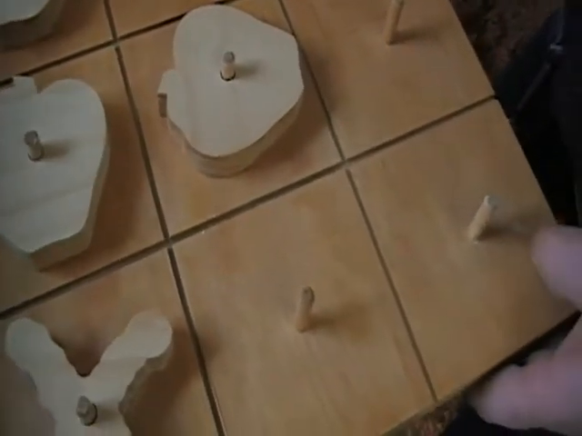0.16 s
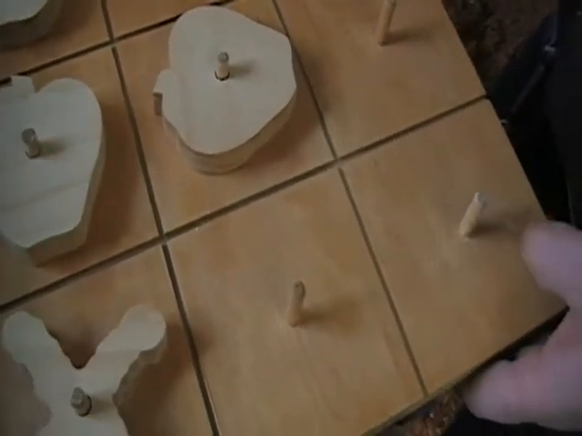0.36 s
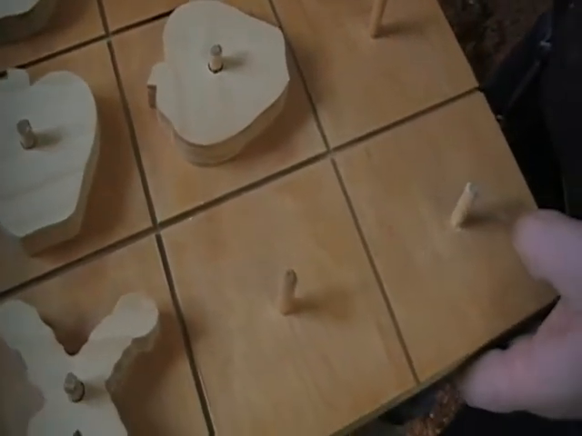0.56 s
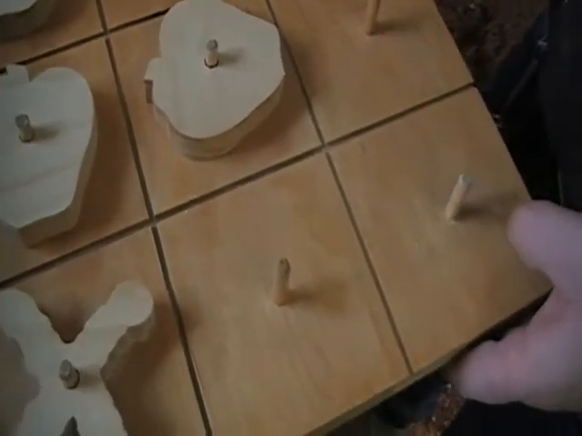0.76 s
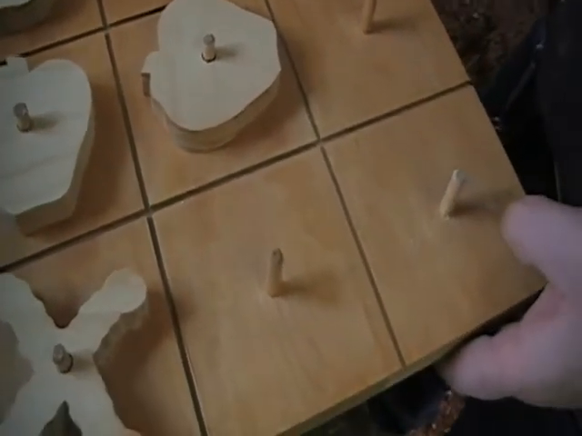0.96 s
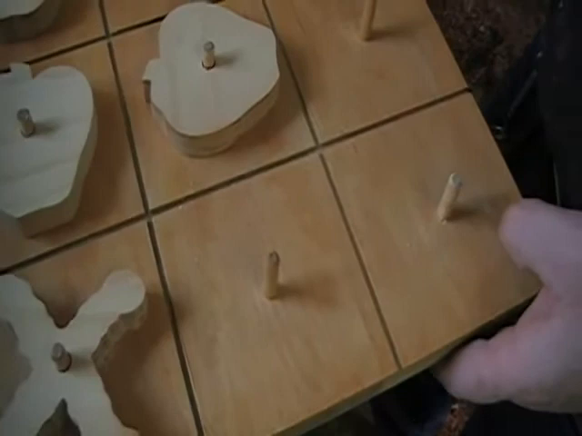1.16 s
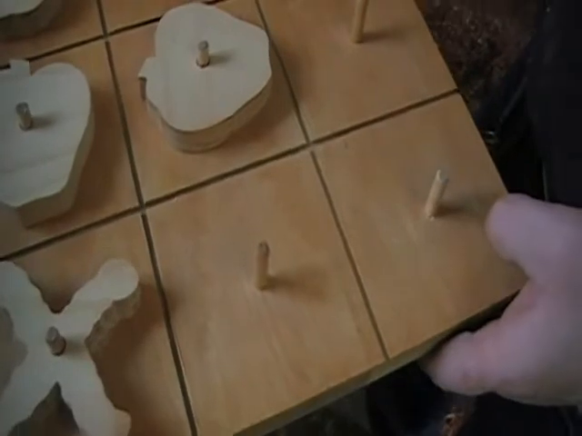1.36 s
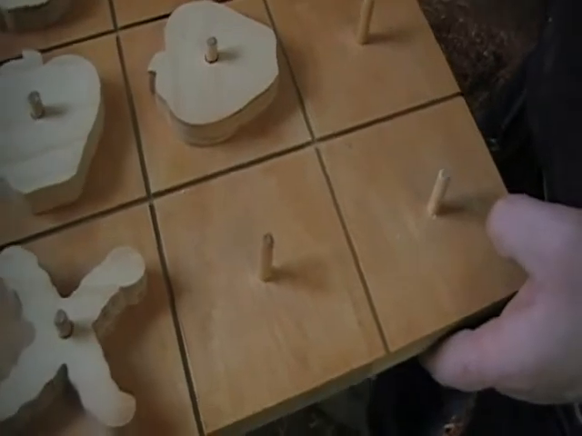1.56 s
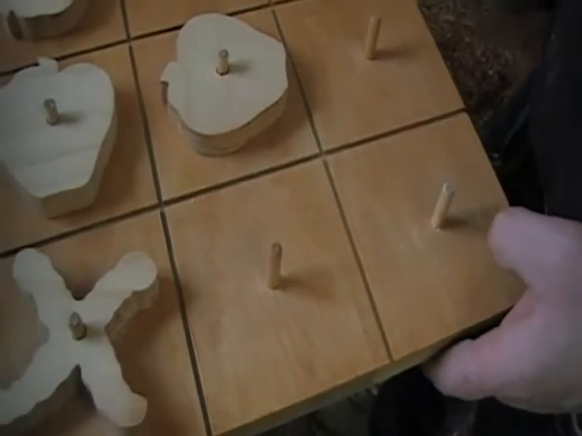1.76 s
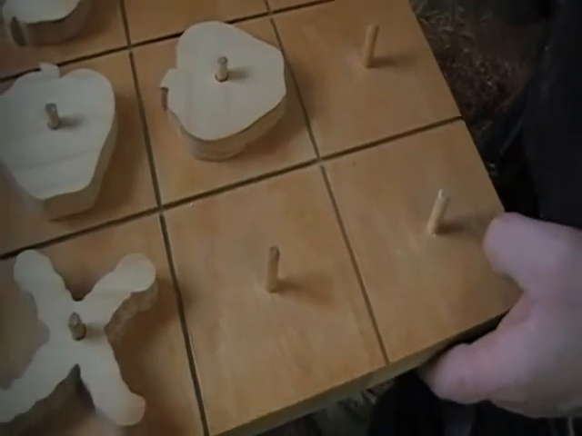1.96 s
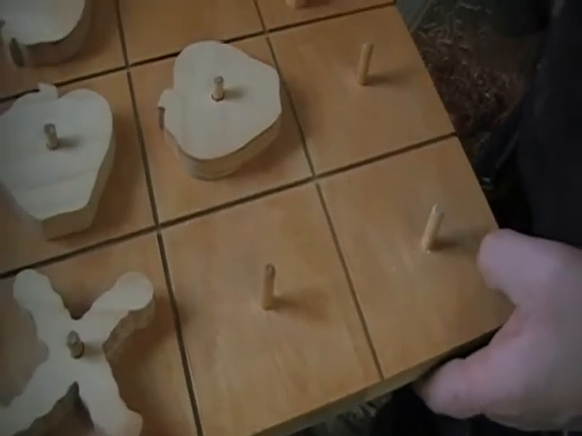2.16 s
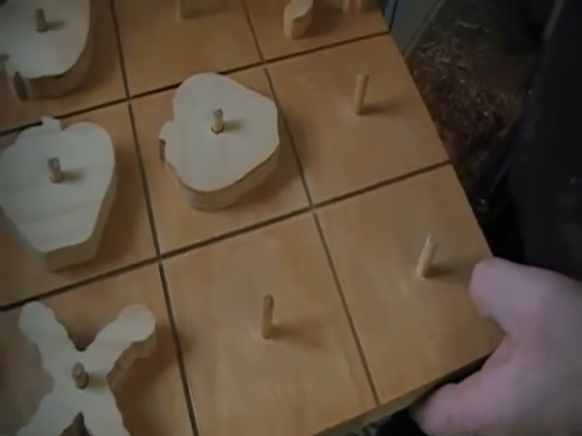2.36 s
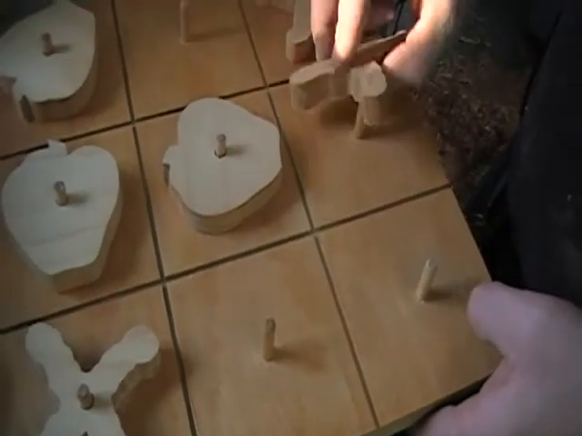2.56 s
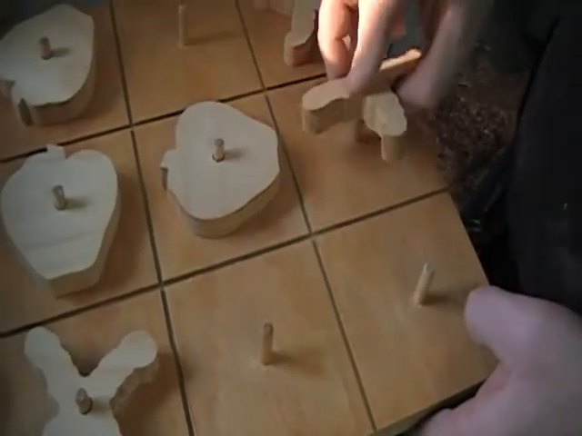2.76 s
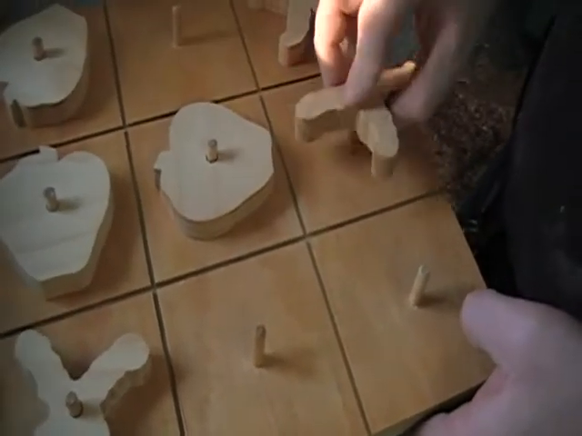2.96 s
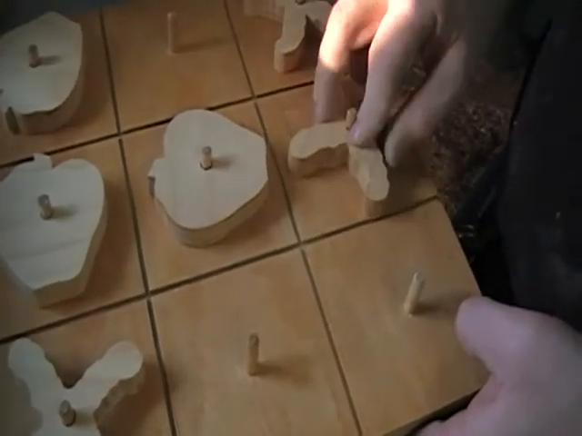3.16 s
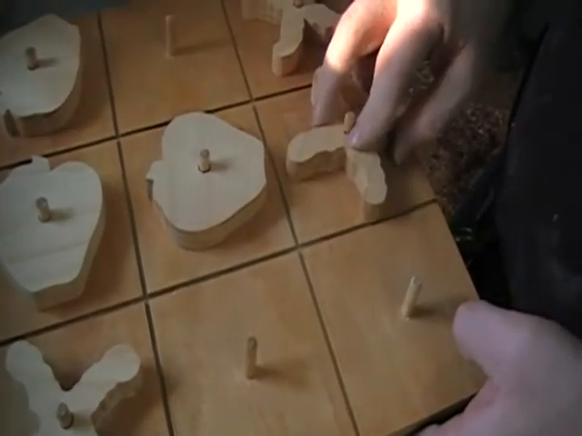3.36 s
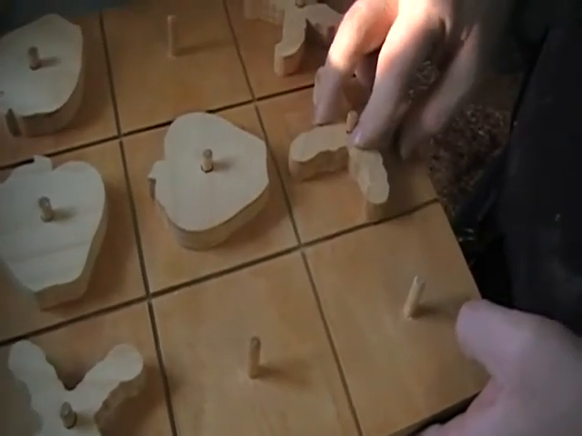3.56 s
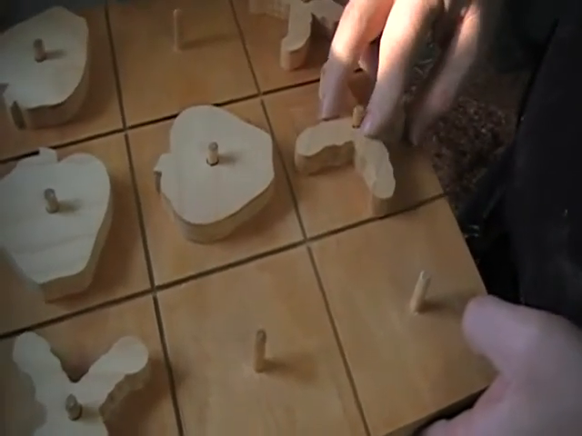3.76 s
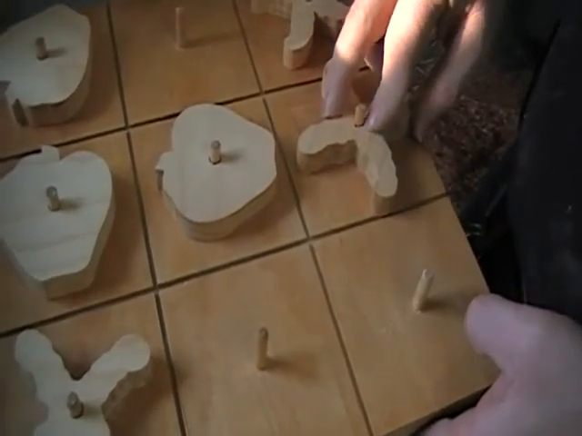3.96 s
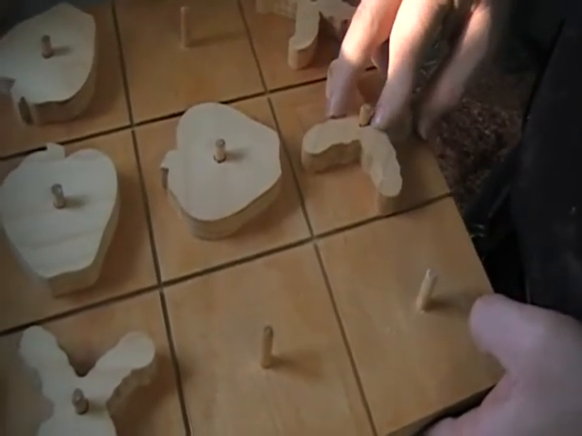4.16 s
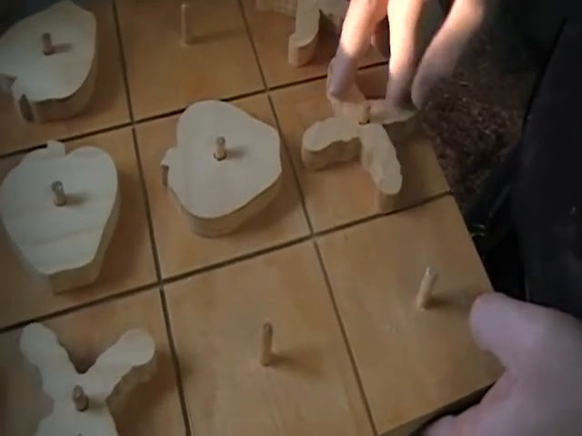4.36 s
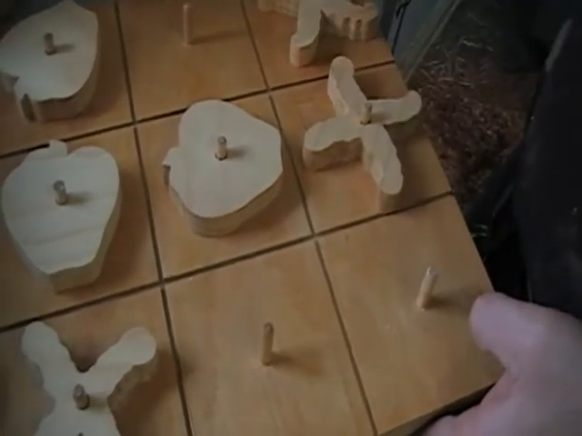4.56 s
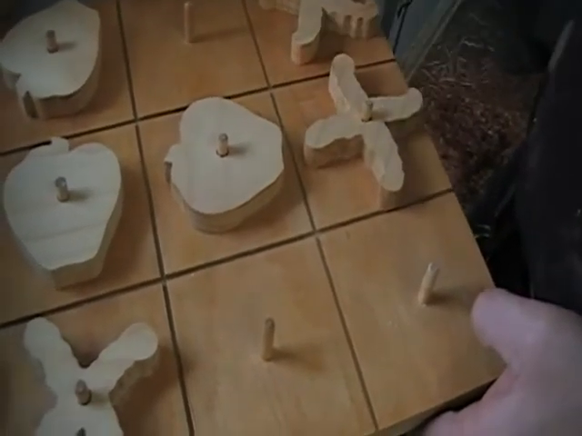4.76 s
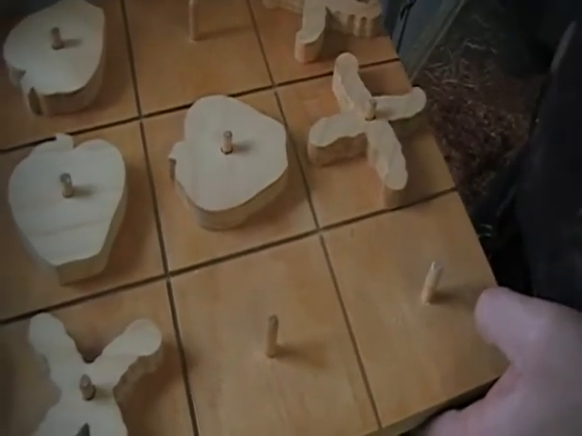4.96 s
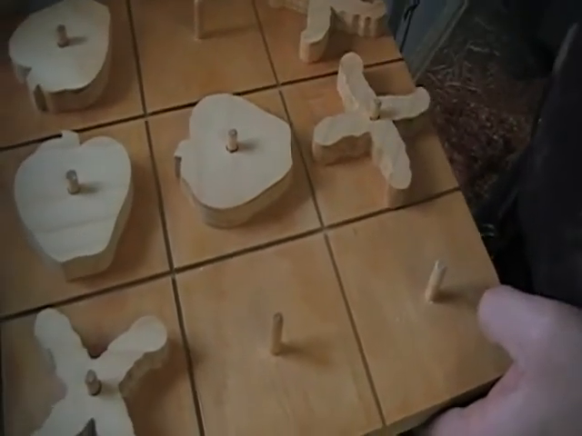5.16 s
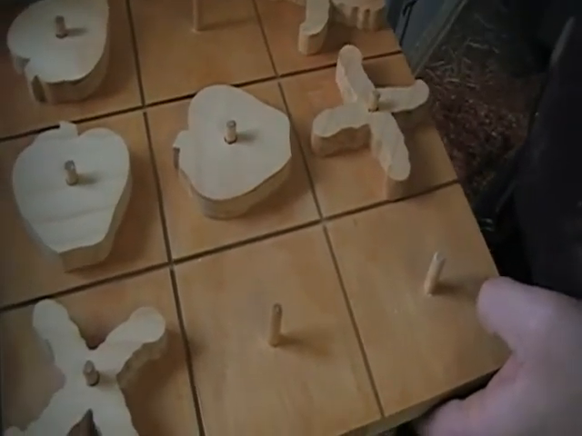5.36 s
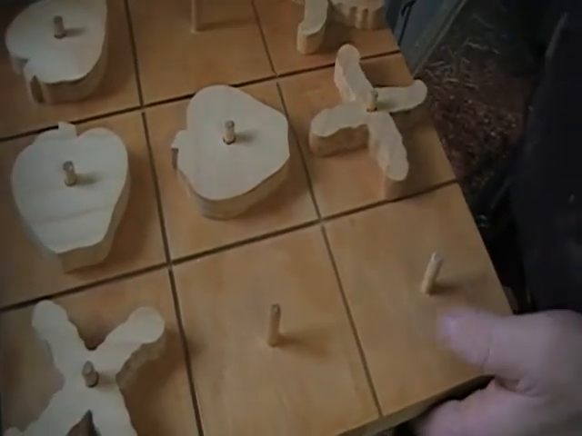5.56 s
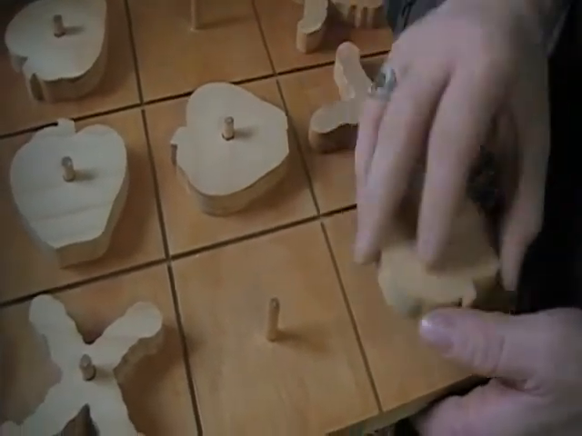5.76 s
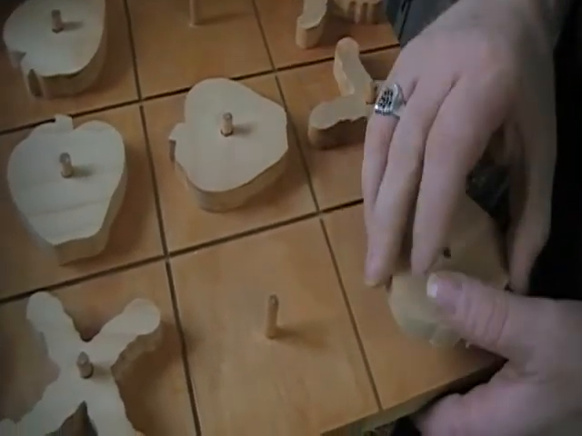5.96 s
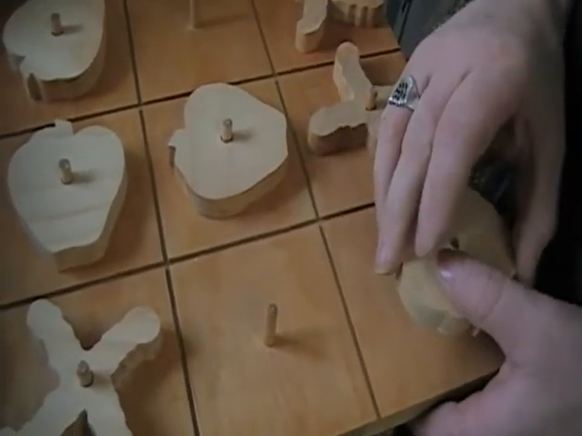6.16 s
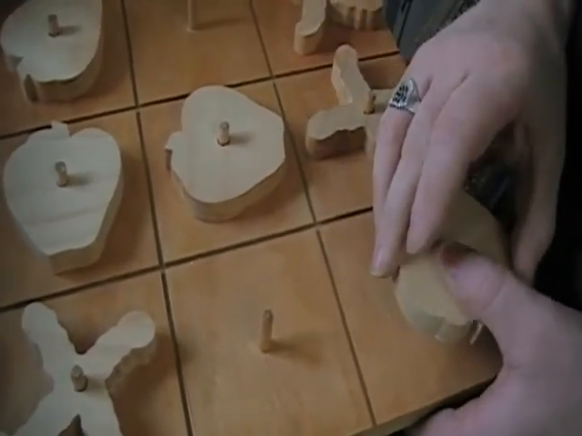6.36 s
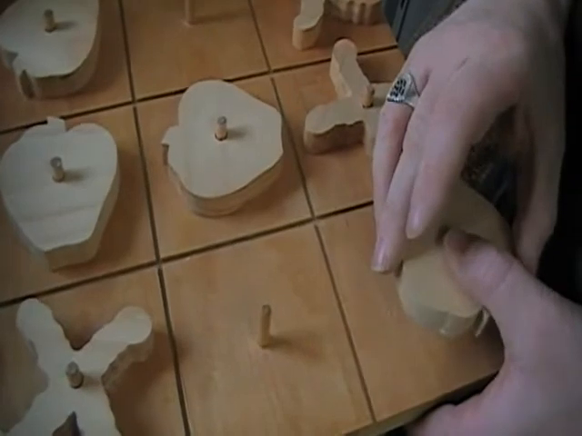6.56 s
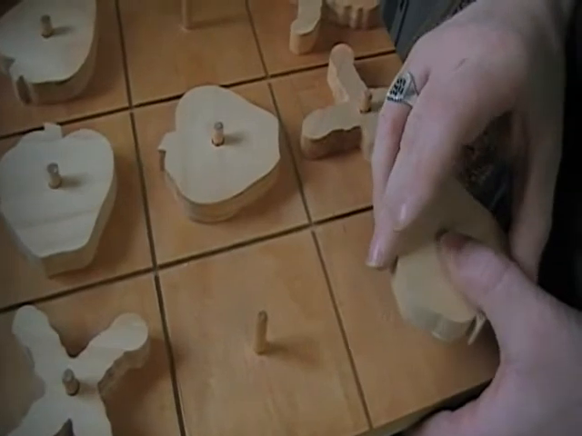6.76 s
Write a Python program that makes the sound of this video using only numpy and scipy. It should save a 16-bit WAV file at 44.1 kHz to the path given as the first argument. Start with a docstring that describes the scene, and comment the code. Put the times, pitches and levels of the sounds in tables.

```python
"""Wooden game pieces are picked up, knocked against dowel pegs and slid down onto a wooden board, up close.
Knocks are short chords of decaying wood modes with a noise crack; slides drive the same modes with grainy noise.
Rubbing, and the bright chatter between and after knocks, hiss as swelling, shaped noise.
A bare room answers with banded noise tails.
Underneath lie a mains buzz of wavering sines and a wide, dull noise bed."""
import sys
import numpy as np
from scipy import signal
from scipy.fft import rfft, irfft
from scipy.io import wavfile

SR = 44100
rng = np.random.default_rng(int(sys.argv[2]) if len(sys.argv) > 2 else 0)


def inscribe(sig):
    """Save sig as 16-bit PCM at rate SR to the path in sys.argv[1].

    A 1-D sig is mono; a 2-D sig holds one channel per row.
    Samples are clipped to [-1, 1] before scaling.
    """
    pcm = np.round(np.clip(np.atleast_2d(sig).T, -1, 1) * 32767)
    wavfile.write(sys.argv[1], SR, pcm.astype(np.int16))


N = 304290  # length in samples

# Modes of the wood in nine families: thud, broad, body, waist, lower arms, upper arms, lower peg, upper peg, tick.
# Columns: f/Hz, t60/s (undamped), level/dB within the family
WOOD_FAMILIES = [
    [(322, 0.024, -4), (447.6, 0.044, -0.5)],
    [(705, .025, 0), (1630, .016, 1), (1880, .018, -1)],
    [(800, .025, -14), (920, .028, 0)],
    [(1090, .022, -3), (1230, .022, 0), (1380, .018, -5), (1560, .014, -6), (1780, .02, -4)],
    [(2000, .018, -10), (2190, .026, 0), (2310, .02, -3)],
    [(2490, .02, -3), (2610, .028, 0), (2770, .018, -8), (3040, .014, -16), (3400, .016, -10)],
    [(3885, .024, -1), (4030, .022, 0)],
    [(4190, .03, -1), (4470, .016, 1), (4810, .016, -5)],
    [(5237, 0.015, 0.5), (5860, 0.016, -2.5), (6700, 0.024, -4.5), (6850, 0.02, -9.5), (7380, 0.02, -9.5),
     (8220, 0.0063, -7.5)],
]
# Broad family against the body. Columns: cross-shaped piece level/dB, round piece level/dB
BROAD_LEVELS = (-17.5, -4.5)
# Tone of the splintery crack. Columns: f/Hz, density level/dB per Hz
CRACK_TONE = [(250, -20.5), (500, -7), (1400, 2.5), (2600, 0.5), (3300, -2), (4800, -2.5), (7000, -12),
              (10500, -31.5)]
# Knocks. Columns: t/s, body level/dB (near 900 Hz); against the body: thud level/dB (below 500 Hz),
# waist level/dB (near 1.3 kHz), arms level/dB (near 2.4 kHz), peg level/dB (near 4.2 kHz),
# tick level/dB (above 5.2 kHz), crack level/dB; lean to the lower arm modes/dB, lean to the upper peg modes/dB,
# finger damping/x (faster decay), pitch of the modes below 1 kHz/x
KNOCKS = [(1.017, -49, -16, 7, -20, -17, -13, -13, -5, 0, 1.5, 1.3),
          (1.078, -59.5, -4, -8, 1.5, -21, 6, 6, 11, 0, 0.7, 0.67),
          (1.985, -62.5, -10, -6, 8.5, 2, 8, 0.5, -5, -2, 1.4, 0.61),
          (2.117, -51, -13, -6.5, 2, -9.5, 9, -6, 3, 0, 1.6, .91),
          (2.1365, -28.5, -19, -11.5, -15, -32.5, -5.5, -9, -2, 1, 0.55, 0.96),
          (2.15, -31.5, -21, -13.5, -24.5, -31, -23, -24, 5, 0, 0.41, 0.89),
          (2.163, -40, -15.5, -18, -18, -28.5, -12, -23, 0.5, 0, 0.97, 1),
          (2.400, -57, -12.5, -7.5, 3.5, -10.5, -11.5, -6.5, 4.5, 2, 0.57, .93),
          (2.6084, -7, -21.5, -8.5, -13, -13.5, -27, -15.5, 3.5, 4, 1.1, 1.035),
          (2.6273, -15, -8.5, -12, 6.5, -2.5, 4.5, -4.5, -1, -3.5, 1.29, 0.98),
          (2.634, -28.5, -8.5, -8, 7.5, -2, -3, -4.5, 1, 0.5, 2.2, 0.94),
          (2.806, -45.5, -14, -8, -3, 1, -6, -10, 0.5, 1, 0.74, 1.04),
          (3.018, -47, -14, -8, -9.5, 1.5, -7, -12, 3, 0.5, 0.45, 1.06),
          (3.03, -43, -12, -5.5, -4, 0.5, -2, -13.5, 0, 1.5, 0.79, 0.92),
          (3.23, -12.5, -20.5, -4, -5.5, -7, -8, -12, -6, -4.5, 0.8, .99),
          (3.2434, -13.5, -13, -4.5, -3, 1, -3.5, -6.5, -3.5, -1.5, 2.7, .98),
          (3.2462, -20.5, -8.5, -8, 2.5, -7.5, -7.5, -8, -7, -2, 1.1, .98),
          (3.257, -29, -3, -8, -1, -3, -15, -10, -3, 0, 1.4, 1.5),
          (5.1025, -51, -12, -2, -3, 0, 7, 1, 2, 0, 3, 1.1),
          (5.555, -55.5, -14.5, 3, -8, -11.5, -11, -9.5, 1.5, 0, 0.68, 1.05),
          (5.8603, -40, -8, -3, -10, -18, -22, -14, 4, 0, 1, .95),
          (5.866, -10, -13, -6, -7, -12.5, -14, -10, 6.5, 1, 1.3, 0.99),
          (5.8712, -14, -11, -8, -18.5, -13.5, -22, -12, 5, 4, 0.94, 0.979),
          (5.8807, -30.5, -4.5, -5, -22, -8.5, -10, -22, 2, -2.5, 0.64, 0.94),
          (6.746, -64.5, -14.5, -7, -6, 1, 3, -13, -4.5, -5, 1.05, 0.82)]
ROUND_PIECE_FROM_S = 5.7  # the round piece is in hand from here on


def blows(scatter_db=1.0, detune=.007, width=.28, crack_s=.003, chatter_s=.003, attack_s=.0006, pan_db=-3.5):
    """Each blow starts all modes, weighted by where it lands; the contact chatters and cracks. Returns both."""
    out = np.zeros((2, 2, N + SR))  # (ring or crack, left or right, sample)
    t = np.arange(SR // 10) / SR
    hz, t60, mode_db = np.concatenate(WOOD_FAMILIES).T
    family_sizes = [len(family) for family in WOOD_FAMILIES]
    # families move the near face in turn towards and away
    sign = np.repeat((-1) ** np.arange(len(WOOD_FAMILIES)), family_sizes)
    opposite = np.array([[1], [-1]])
    chances = rng.standard_normal((len(KNOCKS), 3, len(hz)))
    noises = rng.standard_normal((len(KNOCKS), 3, len(t)))
    for knock, (size, tune, turn), noise in zip(KNOCKS, chances, noises):
        s, body, thud, waist, arms, peg, tick, crack_db, lean, peg_lean, damp, low_pitch = knock
        broad = BROAD_LEVELS[int(s > ROUND_PIECE_FROM_S)]
        family_db = body + np.array([thud, broad, 0, waist, arms + lean, arms - lean,
                                     peg - peg_lean, peg + peg_lean, tick])
        gain = sign * undb(mode_db + np.repeat(family_db, family_sizes) + scatter_db * size)
        # grip and piece shift the low modes
        tuned = np.where(hz < 1000, low_pitch, 1) * hz * (1 + detune * tune)
        decay = np.exp(-np.log(1000) * np.clip(damp, .3, 4) * t / t60[:, None])
        envelope = decay * (1 - np.exp(-t / attack_s))
        # the two microphones face different parts of the piece, so each mode arrives with its own phase lead
        lead = width * turn[:, None] * opposite[:, :, None] / 2
        ring = (gain[:, None] * envelope * np.sin(2 * np.pi * tuned[:, None] * t + lead)).sum(axis=1)
        # the push: one clean impulse, then quiet contact chatter
        push = undb(-24) * noise[0] * np.exp(-t / chatter_s)
        push[0] = 1
        ring = signal.fftconvolve(ring, push[None], axes=1)[:, :len(t)]
        crack = colour(noise[1], CRACK_TONE) + width * colour(noise[2], CRACK_TONE) * opposite
        crack = undb(body + crack_db) * crack * np.exp(-t / crack_s)
        start = int(s * SR)
        out[..., start:start + len(t)] += pan(pan_db) * np.array([ring, crack])
    return out[..., :N]


# Slides of wood on wood. Columns: t/s, rise/s (through 20 dB, at least 6 ms), hold/s,
# fall/s (through 20 dB, at least 6 ms), body level/dB, arms level/dB and peg level/dB against the body,
# lean to the lower arm modes/dB
WOOD_SLIDES = [(1.01, 0.064, 0.066, 0.13, -61.5, -22, -20, 2), (1.954, 0.046, .02, 0.034, -70, 2, 1.5, -9),
               (2.13, 0.034, 0.004, 0.022, -52.5, 1, -15, -3.5),
               (2.17, 0.0079, 0.051, 0.06, -54, -14.5, -34, -4.5),
               (2.28, 0.032, 0.043, 0.18, -63, -22, -28, -4), (2.79, 0.0083, .002, 0.056, -56, -3, 0, -7),
               (2.815, .015, 0.014, 0.027, -58.5, 3.5, 7.5, 6),
               (2.904, 0.099, 0.0011, 0.071, -56.5, -7, -1, 2),
               (3.018, 0.011, 0.025, 0.037, -52.5, -14, 2, -2),
               (3.05, 0.055, 0.043, 0.043, -54, -0.5, 4, -4),
               (3.13, 0.038, 0.003, 0.024, -58, -10, -12.5, -6),
               (3.206, 0.016, 0.011, 0.0068, -56, -11, 6, -2),
               (3.222, 0.0059, 0.0052, 0.005, -48, 0.5, 6.5, -1),
               (3.748, 0.14, 0.0019, 0.26, -65.5, -3, 0, -2.5),
               (4.0, 0.18, 0.0021, 0.2, -65.5, -6, -24, -4), (4.29, 0.096, 0.087, 0.057, -67, -4, -11, -3),
               (4.42, 0.17, 0.0021, 0.057, -61, -2.5, -18.5, -3.5),
               (5.554, 0.03, 0.0022, 0.028, -66, -1.5, -5.5, -2),
               (5.9, 0.0081, 0.0017, 0.0098, -49.5, -13.5, 0, 4.5),
               (5.922, 0.013, 0.028, 0.022, -49.5, -26, -11, 8.5),
               (6.035, 0.055, 0.084, 0.058, -53, 0, 11, 0.5), (6.085, .03, 0.055, 0.045, -58, 6.5, 13, 1),
               (6.17, 0.045, 0.038, 0.035, -56, 0.5, 0.5, 0),
               (6.602, 0.028, .002, 0.089, -61, -5.5, -3.5, 0.5),
               (6.698, .02, 0.0019, 0.019, -65, -4, -2, 2), (6.855, 0.012, .05, .02, -60.5, -1, -1, 4)]


def slides(pan_db=-2.0, apart=0.17, outer_db=-12, waist_db=-8, dead_hz=3650, dead_width_hz=700):
    """Stick-slip grains ring the wood modes; outer families answer less, and arms and peg cancel between bands."""
    def less(family, by_db):
        return [(hz, t60, db + by_db) for hz, t60, db in family]

    thud, broad, body, waist, low_arms, high_arms, low_peg, high_peg, tick = WOOD_FAMILIES
    body_group = less(thud, outer_db) + body + less(broad + waist, waist_db)
    peg_group = less(low_peg, -7.0) + high_peg[:1] + less(high_peg[1:], -6.5) + less(tick, outer_db)
    # weights of the level columns: body, arms, peg, lean
    groups = [([1, 0, 0, 0], body_group), ([1, 1, 0, 1], low_arms),
              ([1, 1, 0, -1], high_arms), ([1, 0, 1, 0], peg_group)]
    out, held = 0, 1.1  # held: modes ring this many times their t60
    for weights, modes in groups:
        mid = resonate(grain(2.3) * undb(2.5 * walk(90)), modes, held)
        side = resonate(grain(2.5), modes, held)
        out = out + strokes(WOOD_SLIDES, weights) * mid_side(mid, apart * side)
    out = signal.lfilter(*signal.iirnotch(dead_hz, dead_hz / dead_width_hz, fs=SR), out)
    # slides stay dull above 7.5 kHz
    return pan(pan_db) * signal.sosfilt(signal.butter(4, 7500, fs=SR, output="sos"), out)


# Hiss strokes: rubbing, and the bright chatter between and after knocks.
# Columns: t/s, rise/s (through 20 dB, at least 6 ms), hold/s,
# fall/s (through 20 dB, at least 6 ms), level/dB, top end against it level/dB
HISS_STROKES = [(.01, 3, .01, -0.44, -68, -25), (.114, 0, .005, .02, -70.5, -17),
                (.36, 0.08, 0.16, -0.28, -59.5, -13), (.51, 0.09, 0.019, -0.48, -56.5, -16),
                (.618, 0.07, 0.03, .03, -65.5, -18), (.814, 0, 0.0061, 6, -68.5, -14),
                (.92, 0.13, 0.07, 0.1, -60.5, -18.5), (1.086, 1.1, .002, 4, -71.5, -18),
                (1.93, -0.26, 0.029, 0.02, -59, -4.5), (2.116, .014, .026, .012, -49, -12),
                (2.15, .02, .03, .12, -58, -12), (2.616, -0.02, 0.014, 0.0452, -38.5, -9),
                (2.64, 0, 0.0049, -0.075, -43, -7), (2.81, -0.6, 0.012, 0, -56.5, -38),
                (2.9, 0, 0.0082, 0, -62, -7), (3.024, -0.27, 0.063, -0.57, -52.5, -6.5),
                (3.075, 0, 0.02, -0.1051, -44.5, -13), (3.125, -0.1, 0.011, -0.85, -55.5, -16),
                (3.208, -0.25, 0.019, -0.12, -48.5, -6), (3.235, -0.0668, 0.0025, -0.004, -35.5, -7.5),
                (3.27, 0.5, 0.0055, 0.45, -69, -24), (3.766, -0.02, 0.0017, 0.2, -63.5, -12.5),
                (3.886, -3.3, 0.12, 0.5, -74, -7), (4.3, -0.8, 0.046, 0.5, -66.5, -7),
                (4.41, -0.02, 0.01, 0.05, -53.5, -6), (5.103, .006, 0.0029, 0.02, -51.5, -29),
                (6.01, -0.3, 0.046, -0.52, -63, -32), (6.08, -0.24, 0.11, 0, -59.5, -19),
                (6.3, 1.2, 0.0019, 2.3, -73.5, -7.5), (6.408, -0.05, 0.0044, 0.2, -65, -9),
                (6.6, -0.07, 0.0037, 0.13, -61.5, -13), (6.7, -2, .19, 12, -70.5, -10),
                (6.86, 0.03, 0.022, .015, -55, -13)]
# Tone of the main hiss. Columns: f/Hz, density level/dB per Hz
HISS_TONE = [(2400, -16), (3000, -7.5), (3400, -8.5), (3650, -22), (3900, -8), (4600, -5), (6000, 0.5),
             (7300, -2), (8300, -17.5), (9000, -55)]
# Tone of its top end. Columns: f/Hz, density level/dB per Hz
HISS_TOP_TONE = [(7800, -9.5), (8600, 9), (10300, -2.5), (11000, -6.5)]


def hisses(pan_db=-1.5, apart=0.37):
    """Rubbing and knock chatter as bright, grainy hiss: flickering noise in two bands under the stroke curves."""
    out = 0
    for tone, weights in ((HISS_TONE, [1, 0]), (HISS_TOP_TONE, [1, 1])):
        mid = colour(grain(4.0) * undb(3.2 * walk(60)), tone)
        side = colour(grain(2.97), tone)
        out = out + strokes(HISS_STROKES, weights) * mid_side(mid, apart * side)
    return pan(pan_db) * out


# Reverb tail in bands. Columns: f/Hz, t60/s, level/dB
ROOM_BANDS = [(201.9, 0.33, 12), (393, 0.72, 15), (885, 0.85, 9.5), (1320, 0.98, 6), (2110, 0.83, 3),
              (2500, 0.78, 1.5), (3300, .75, 2.5), (4120, 0.74, 1.5), (5930, 0.57, 4.5),
              (9000, 0.18, -17.5)]
# One air resonance under the board that outlasts the knocks. Columns: f/Hz, t60/s, level/dB
BOARD_HOLLOW = (790, 0.5, 25)


def room(x, gap_s=0.0097, build_s=0.061, side_db=-9, wet_db=-17, near_db=-3, near_t60=0.52):
    """Table and board answer at once; the walls build up later and die band by band, mostly alike left and right."""
    t = np.arange(SR) / SR
    walls = np.clip((t - gap_s) / build_s, 0, 1)
    near = undb(near_db) * fade(t, near_t60)
    tails = []
    for _ in range(2):
        tail = 0
        for hz, t60, db in ROOM_BANDS:
            band = colour(rng.standard_normal(SR), [(hz / 1.9, -12), (hz, 0), (hz * 1.6, -12)])
            tail = tail + undb(db) * band * np.sqrt(hz) * fade(t, t60)
        tails.append(tail)
    hollow_hz, hollow_t60, hollow_db = BOARD_HOLLOW
    tails[0] = tails[0] + undb(hollow_db) * np.sin(2 * np.pi * hollow_hz * t) * fade(t, hollow_t60)
    mid, side = np.array(tails) * (walls + near)
    pair = mid_side(mid, undb(side_db) * side) / np.sqrt(np.sum(mid ** 2))
    return undb(wet_db) * pan(-2.0) * signal.fftconvolve(x.mean(axis=0)[None], pair, axes=1)[:, :N]


# Multiples of the mains that sound in the buzz. Column: multiple/x
BUZZ_MULTIPLES = [1, 13, 3, 4, 5, 6, 8, 10, 12, 14, 26, 16, 18, 22, 24, 28, 30, 32, 36, 38, 42]
# One row for each multiple, before the waver. Columns: left level/dB rms, right level/dB rms
BUZZ_LEVELS = [(-107, -80.5), (-89, -88), (-85.5, -70), (-79, -72), (-74.5, -75.5), (-76, -70), (-70, -70),
               (-77.5, -73.5), (-71.5, -68.5), (-75.5, -68.5), (-90, -79.5), (-72, -73), (-82, -73.5),
               (-76.5, -71), (-74.5, -87.5), (-92, -85.5), (-77.5, -77), (-80, -78), (-83, -88.5),
               (-91, -88.5), (-88.5, -88.5)]


def hum(mains_hz=60.02, lead_rad=0.96, lead_fall=14.0, waver_db=2.0):
    """Wavering sines at multiples of the mains; the low ones reach the left side a little early."""
    out, t = 0, np.arange(N) / SR
    starts = rng.uniform(0, 2 * np.pi, len(BUZZ_LEVELS))
    for k, (left_db, right_db), start in zip(BUZZ_MULTIPLES, BUZZ_LEVELS, starts):
        lead = np.array([[lead_rad * np.exp(-k / lead_fall)], [0]])
        level_db = np.array([[left_db], [right_db]]) + waver_db * walk(3)
        out = out + np.sqrt(2) * undb(level_db) * np.sin(2 * np.pi * k * mains_hz * t + start + lead)
    return out


# Tone of the noise bed, centre. Columns: f/Hz, density level/dB per Hz
AIR_MID_TONE = [(30, -22.5), (100, -10.5), (200, -3), (400, -2), (1000, -2), (1500, -6.5), (2500, -10.5),
                (4000, -12), (6500, -13), (7600, -19.5), (8600, -26.5), (9500, -60)]
# Tone of the noise bed, sides. Columns: f/Hz, density level/dB per Hz
AIR_SIDE_TONE = [(18, -53.5), (30, -35.5), (48, -16.5), (149, -7.5), (178, -2), (206, -3), (355, -1),
                 (675, -1.5), (864, -4), (953, -3.5), (6710, -26), (8380, -20.5), (11000, -54.5),
                 (14300, -63), (22000, -120)]


def air(mid_db=-64.5, side_db=-60):
    """Wide, dull background noise: separate centre and side noises whose levels drift slightly."""
    mid, side = (undb(db + 0.3 * walk(5.0)) * colour(rng.standard_normal(N), tone)
                 for tone, db in ((AIR_MID_TONE, mid_db), (AIR_SIDE_TONE, side_db)))
    return pan(-0.59) * mid_side(mid, side)


def resonate(x, modes, held):
    """Rings x through two-pole resonators given as (f/Hz, t60/s, level/dB), t60 stretched by held; rms 1."""
    delay = np.exp(-2j * np.pi * np.arange(len(x) // 2 + 1) / len(x))  # one sample, per frequency bin
    response = 0
    for hz, t60, db in modes:
        r = np.exp(-np.log(1000) / (held * t60 * SR))
        w = 2 * np.pi * hz / SR
        poles = 1 - 2 * r * np.cos(w) * delay + (r * delay) ** 2
        response = response + undb(db) * np.sqrt(1 - r) * (1 - delay ** 2) / poles
    return unit(irfft(rfft(x) * response, len(x)))


def grain(rough_db):
    """Dense noise whose samples vary in size: tiny slips of a rubbed surface."""
    return rng.standard_normal(N) * undb(rough_db * np.minimum(rng.exponential(size=N), 5))


def strokes(table, weights, curve=1.18):
    """Gain curve of all strokes, the loudest winning: each swells, holds and fades; weights add up the levels."""
    t = np.arange(0, N + 64, 64) / SR
    s, rise, hold, fall, *levels = np.transpose(table)[..., None]
    before = (s - t) / np.maximum(rise, .006)
    after = (t - s - np.maximum(hold, 0)) / np.maximum(fall, .006)
    away = np.maximum(np.maximum(before, after), 0)
    # curve 1 = straight fade in dB, more = rounder top and quicker end
    loudest = (np.tensordot(weights, levels, axes=1) - 20 * away ** curve).max(axis=0)
    return np.interp(np.arange(N) / SR, t, undb(loudest))


def walk(rate):
    """Random levels joined by straight lines, rate a second."""
    knots = rng.standard_normal(int(N / SR * round(rate)) + 2)
    return 0.74 * np.interp(np.arange(N) * rate / SR, np.arange(len(knots)), knots)


def colour(x, tone):
    """Shapes x by (f/Hz, level/dB) points joined over log frequency; rms 1."""
    hz, db = np.transpose(tone)
    bins = np.maximum(np.arange(len(x) // 2 + 1) * SR / len(x), 1)
    curve_db = np.interp(np.log(bins), np.log(hz), db, left=-80, right=-80)
    return unit(irfft(rfft(x) * undb(curve_db), len(x)))


def fade(t, t60):
    """Exponential decay that falls 60 dB in t60 seconds."""
    return np.exp(-np.log(1000) * t / t60)


def mid_side(mid, side):
    """Left and right from a centre signal and an opposed side signal."""
    return np.array([mid + side, mid - side])


def pan(db):
    """Left and right gains, db being left minus right."""
    return undb(np.array([[db], [-db]]) / 2)


def unit(x):
    """Scales x to rms 1."""
    return x / np.sqrt(np.mean(x ** 2))


def undb(db):
    """Decibels to amplitude."""
    return 10 ** (np.asarray(db, float) / 20)


def scene(ring_to_walls_db=-9.5, crack_to_walls_db=7):
    """Mixes the close wood and hiss with their room answer, the buzz and the noise bed."""
    knocks, cracks = blows()
    rubs = slides() + hisses()
    close = knocks + cracks + rubs
    # the crack spreads all round, the ring stays near the board
    to_walls = undb(ring_to_walls_db) * knocks + undb(crack_to_walls_db) * cracks + rubs
    # small pieces radiate no bass
    bass_cut = signal.butter(4, 260, "high", fs=SR, output="sos")
    close, to_walls = signal.sosfilt(bass_cut, [close, to_walls])
    return close + room(to_walls) + hum() + air()


def record(dry):
    """Rounds the loudest peaks softly; nothing sounds above 11 kHz."""
    soft = np.tanh(1.12 * dry) / 1.12
    return signal.sosfilt(signal.ellip(10, .2, 90, 11000, fs=SR, output="sos"), soft)


dry = scene()
out = record(dry)
inscribe(out)
```